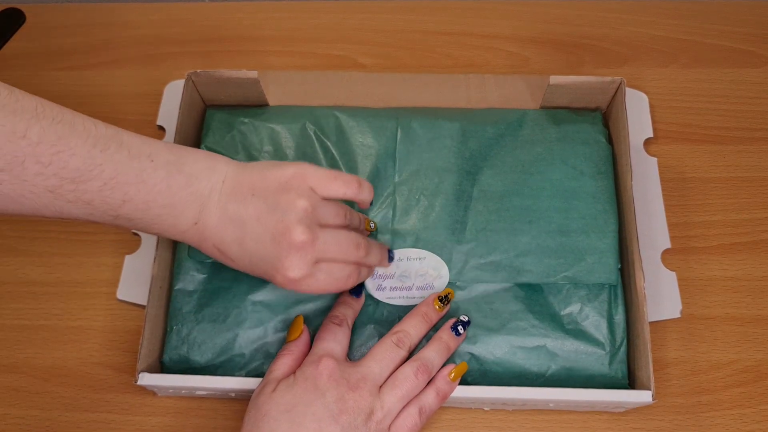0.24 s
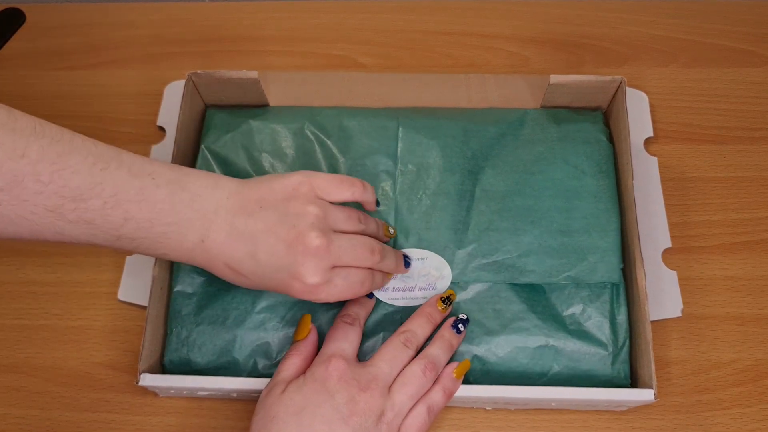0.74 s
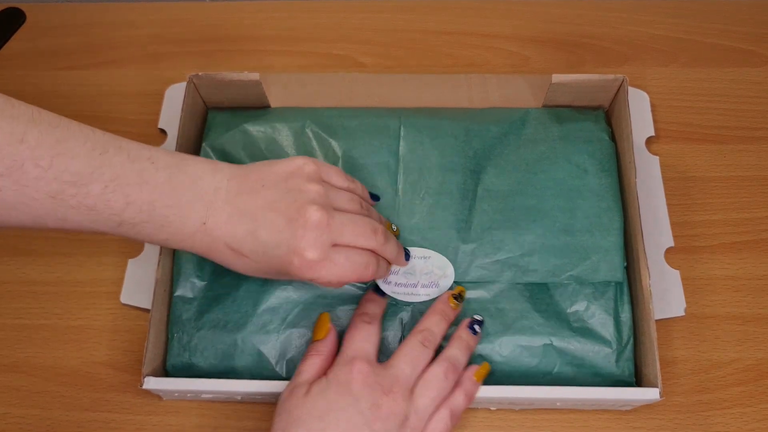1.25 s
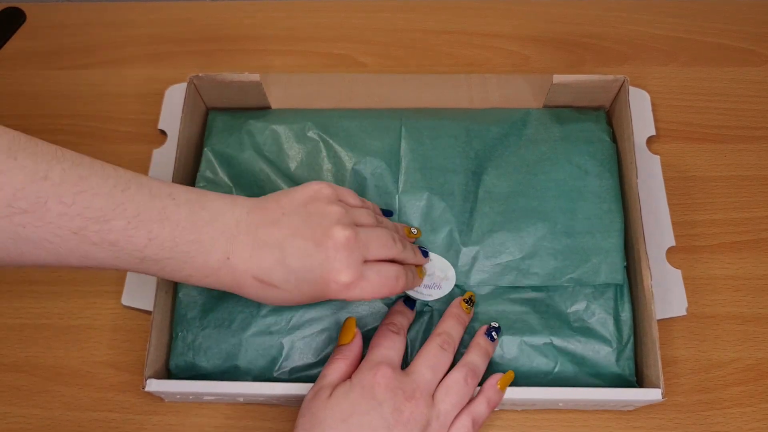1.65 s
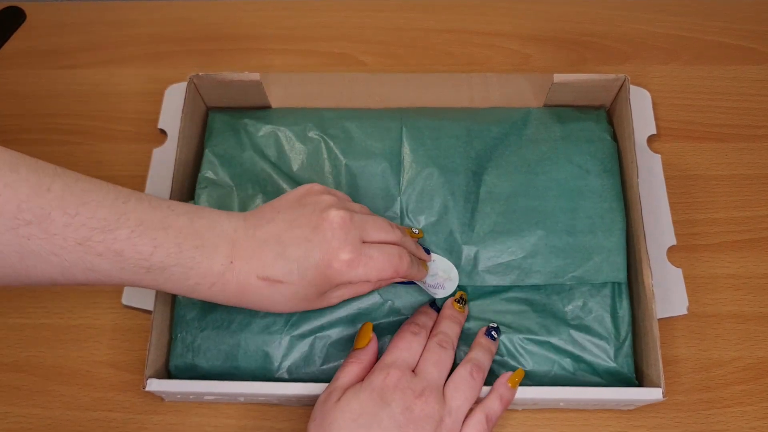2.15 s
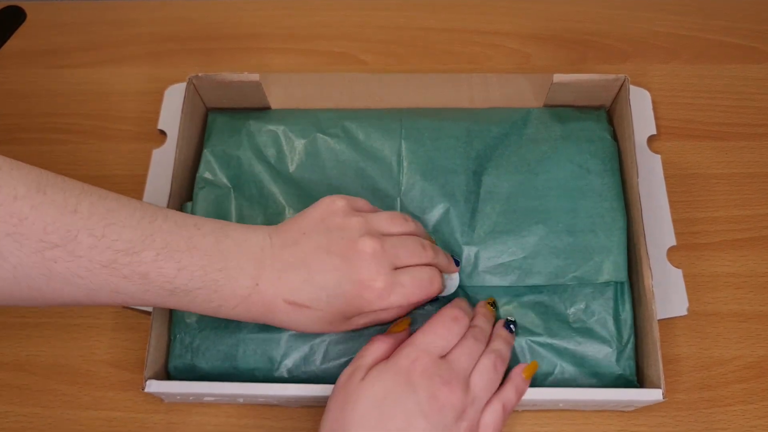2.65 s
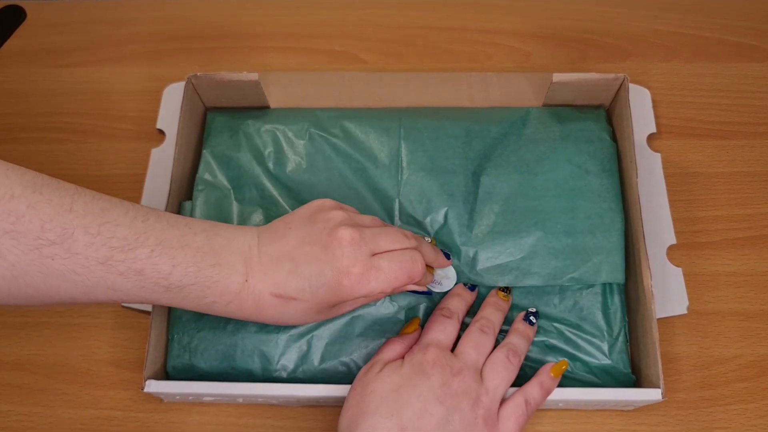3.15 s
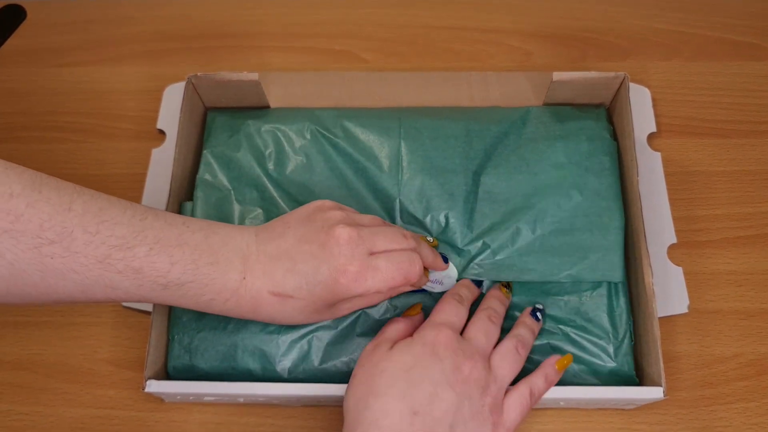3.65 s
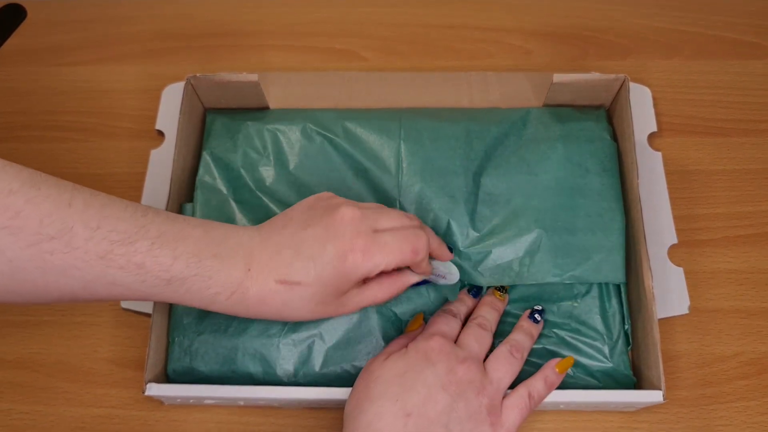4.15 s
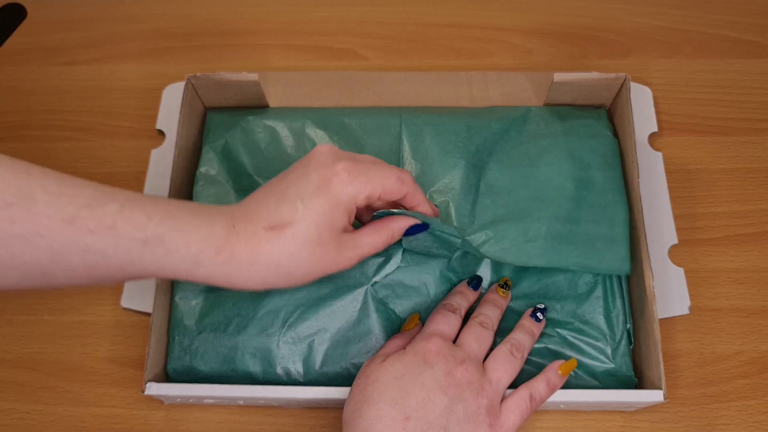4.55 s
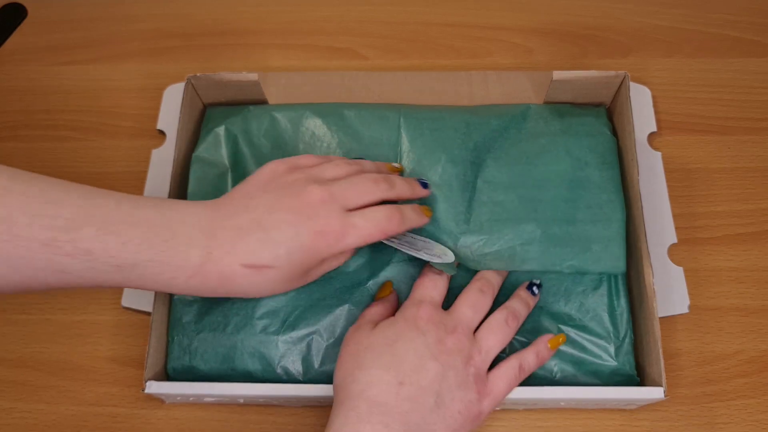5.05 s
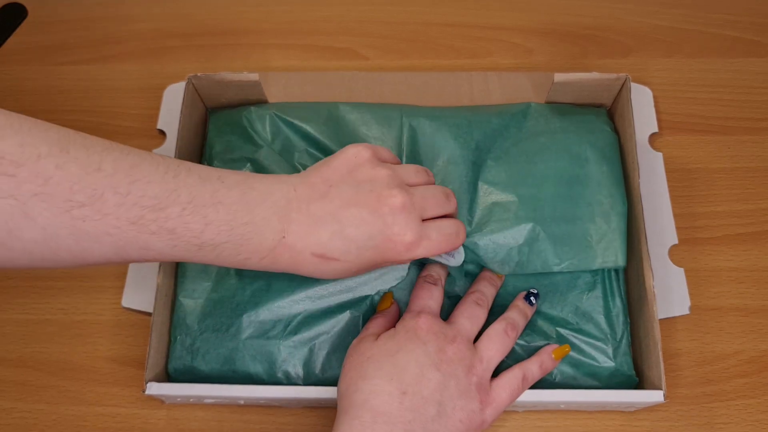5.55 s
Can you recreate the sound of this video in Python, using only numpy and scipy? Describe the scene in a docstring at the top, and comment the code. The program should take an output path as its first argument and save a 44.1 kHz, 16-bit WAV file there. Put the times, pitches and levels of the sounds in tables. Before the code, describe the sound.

Hands fumble at crisp tissue paper in a box, crinkling and rustling unevenly, with small snaps and one sharp crack as a sticker lets go.

```python
"""Sticker peeled off tissue paper.

Hands peel a sticker off the tissue lining of a shallow cardboard box, on a table in a small room.
The sheet rustles with tiny random creases, its panels rasp, single folds snap, runs of folds crunch,
and one sharp crack frees the sticker. Paper and box resonances colour the creases; a short noise
tail is the room. Filtered noise rumbles low under it all, with a faint sine hum.
"""
import sys
import numpy as np
from scipy import signal
from scipy.fft import rfft, irfft
from scipy.io import wavfile
from scipy.ndimage import uniform_filter1d

SR = 44100
rng = np.random.default_rng(int(sys.argv[2]) if len(sys.argv) > 2 else 0)


def materialize(psi):
    """Save the field psi as 16-bit PCM at rate SR to the path in sys.argv[1].

    A 1-D psi becomes a single channel; in a 2-D psi each row is a channel.
    """
    bounded = np.clip(np.atleast_2d(psi).T, -1, 1)
    quanta = np.round(bounded * 32767).astype(np.int16)
    wavfile.write(sys.argv[1], SR, quanta)


N = 255942

# room rumble spectrum, relative: (frequency [Hz], density [dB per Hz])
RUMBLE_SPECTRUM = [(15, -25), (30, -18), (40, 0.5), (58, 0.5), (72, -3), (95, -7.5), (125, -18),
                   (250, -17.5), (1000, -26), (16000, -41)]
# rumble swelling and sinking: (time [s], RMS level [dB])
RUMBLE_LEVEL = [(0, -61), (1.0, -61.5), (1.9, -63), (2.2, -59), (2.9, -60.5), (3.7, -58), (4.4, -60),
                (5.8, -60.5)]
HUM_HZ, HUM_RMS_DB = 53.3, -71.5

# tissue paper in its box, relative: (frequency [Hz], density [dB per Hz])
PAPER_SPECTRUM = [(60, -26), (140, -17), (200, -17), (280, -9.5), (420, -4.5), (560, -6), (700, -4),
                  (980, -8.5), (1300, -4.5), (1800, -3.5), (2250, -5), (3000, -2.5), (4900, -4),
                  (6500, -1.5), (9500, -4.5), (13000, -6), (16000, -9.5)]
# resonances of box and sheet: (centre [Hz], width [Hz], lift [dB])
RESONANCES = [(465, 30, 0.5), (662, 54, 6), (1250, 200, 3), (1568, 165, 4.5), (1770, 180, 2),
              (2650, 1370, 2.5), (6640, 1600, 2)]
# stereo balance of the paper: (frequency [Hz], left minus right [dB])
LEFT_MINUS_RIGHT = [(60, -8.5), (200, 2.5), (400, 3.5), (700, 4), (1290, -1), (2400, -0.6), (4400, -1.2),
                    (8000, 0.3), (15000, 0)]
PAPER_TOP_HZ, CUTOFF_HZ = 17500, 15950

BODY_TOP_HZ, TILT_PIVOT_HZ = 1000, 5500
# splits between the registers above the hollow body: (frequency [Hz])
REGISTER_EDGES_HZ = [2300, 4800, 9000]
# nominal centres of those registers: (frequency [Hz])
REGISTER_CENTRES_HZ = [1500, 3300, 6600, 12000]

# steady grip between strokes; slack paper sounds hollow, taut paper crisp:
# (time [s], rustle level [dB], hollow body [dB], brightness [dB per octave])
GRIP = [(0, -48, 2, -1.5), (.5, -41.5, 1.5, 0), (.72, -46.5, 5.5, -0.2), (1.03, -46, 3.5, 0.5),
        (1.42, -41.5, 1, -0.5), (1.485, -51, 4, 0), (1.57, -39.5, 1, -1.5), (2.03, -47.5, 0, -0.2),
        (2.55, -41.5, 4.5, -1.1), (2.97, -42, 2.5, -1.5), (3.23, -46.5, 7, -1.5), (3.36, -42, 2, 0.2),
        (3.92, -40.5, 3, -0.6), (4.14, -46.5, 4, .5), (4.3, -43, 3.5, -0.8), (4.64, -46, 4.5, -1),
        (5.12, -41.5, 1.5, 0.2), (5.8, -38.5, 4, 1.2)]
# fingers push or pull the sheet and one broad panel flexes: (time [s], length [s], level [dB],
# hollow body [dB], brightness [dB per octave], panel pitch [Hz], panel against level [dB])
STROKES = [(0, 0.014, -39.5, 0, 0.5, 1410, -8.5), (0.176, 0.024, -40, -4, 2, 1340, -7.5),
           (0.423, 0.015, -43.5, -16, 0, 1910, -1.5), (0.519, 0.024, -36.5, 2.5, -.5, 1430, -15),
           (0.903, 0.082, -35.5, 1.5, 0, 1780, -27), (1.25, 0.061, -35.5, 2, 1.3, 1700, -9),
           (1.617, .18, -31, 0.9, 0.3, 3040, -10), (1.871, 0.032, -38.5, -2, .5, 1810, -14),
           (1.96, 0.022, -41, 7.5, 2, 1800, -20), (2.072, 0.18, -37.5, -0.5, 0.3, 2340, -15.5),
           (2.34, .015, -38.5, -5, 1.2, 1800, -14), (2.407, 0.016, -37, 2.5, 2.8, 1800, -10.5),
           (2.636, 0.037, -37, -1, -1, 2870, -10), (2.787, 0.044, -38, 2, -0.2, 2440, -5.5),
           (3.063, 0.039, -42, 2, -0.5, 3160, -14), (3.347, 0.12, -39, 1.5, 0, 1750, -10),
           (3.761, 0.02, -46, 7, 7, 2800, -1), (4.343, 0.1, -42, 3.5, 1.5, 6670, -3),
           (4.446, 0.12, -30.5, -3, 2.6, 3870, -11.5), (4.702, .035, -42.5, 1, 2, 1740, -20),
           (4.824, 0.028, -42, 4.5, 0.5, 1710, -14), (5.332, 0.32, -38, 1.5, 1, 1620, -15),
           (5.769, .04, -28.5, -1, 1.3, 6500, -10)]
STROKE_RISE_DB_PER_S, STROKE_SAG_DB_PER_S, STROKE_FALL_DB_PER_S = 464, 1.5, 413
# sharp tugs at the sticker, sagging as the paper yields: (time [s], length [s], level [dB],
# hollow body [dB], brightness [dB per octave], panel pitch [Hz], panel against level [dB], sag [dB per s])
TUGS = [(0.291, 0.045, -26, 4.5, 0.68, 1880, -10.5, 100), (1.083, 0.077, -26, 3, 1.6, 1250, -16, 65),
        (3.969, 0.058, -21.5, -1.5, 1.7, 6100, -7, 126)]
TUG_RISE_DB_PER_S, TUG_FALL_DB_PER_S = 3200, 344

# single folds snapping:
# (time [s], level of the energy spread over 4 ms [dB], ring [Hz], brightness [dB per octave])
SNAPS = [(.182, -37.5, 1460, -6.5), (0.4345, -31, 7500, 2), (0.608, -34.5, 5900, -2),
         (0.8059, -33.5, 4700, 1.5), (.9363, -31.5, 6800, 8), (1.053, -39, 7700, 1), (1.083, -28, 3320, -9),
         (1.174, -32.5, 10000, 4), (1.5, -39, 4300, -0.5), (1.5662, -34, 7600, 2), (1.6, -27, 6500, 3.5),
         (1.646, -25.5, 7600, -1.5), (1.6925, -23.5, 7300, -6.5), (1.7163, -26, 5930, -1),
         (1.7434, -26.5, 3020, 3), (1.7594, -29.5, 8200, -2), (1.787, -30, 6100, 1),
         (2.2148, -27.5, 6500, -1), (2.797, -33, 1700, -1.5), (2.9206, -33.5, 5350, -2.5),
         (3.076, -32.5, 7600, -1.5), (3.1664, -31.5, 6800, -0.5), (3.3503, -34, 9200, 0),
         (3.8904, -30, 6200, -1.5), (3.9253, -26.5, 7500, -4), (4.1061, -35, 8400, -3),
         (4.126, -36.5, 6200, 2), (4.4666, -34, 7600, -5), (5.2616, -34, 7000, 3.5), (5.6984, -34, 7700, 3)]
# faint stray snaps: least level against the grip, mean random excess before its cap, mean brightness
TICKS_PER_S, TICK_DB, TICK_SPREAD_DB, TICK_TILT_DB_PER_OCTAVE = 23, -0.5, 2, 2.8
# runs of folds giving way together:
# (centre time [s], level [dB], standard deviation of the bell [s], brightness [dB per octave])
CRUNCHES = [(0.295, -27.5, 0.0097, 5.5), (3.403, -34, .005, 4), (3.447, -35.5, 0.011, 7),
            (3.477, -32.5, 0.0069, 2.5), (3.513, -34.5, 0.0047, 7), (3.557, -31, 0.011, 3),
            (5.459, -30, 0.007, 3.5), (5.518, -39, .006, 10), (5.56, -33.5, 0.011, 8.5)]
# the sticker lets go; the level is the energy spread over 4 ms, before panning
CRACK_S, CRACK_DB, CRACK_HZ, CRACK_WIDTH_HZ = 3.9684, -15.5, 6400, 900
# the tail's treble decays in a fraction of this time; level against the dry paper
ROOM_T60_S, ROOM_DB = 0.15, -10


def from_db(db):
    """Amplitude ratio of a level in dB."""
    return 10 ** (np.asarray(db) / 20)


def rms_one(x):
    """Scales to RMS 1 over all channels."""
    return x / np.sqrt(np.mean(x ** 2) + 1e-20)


def at_hz(points, hz):
    """Reads a spectrum on a log-frequency axis."""
    points = np.array(points)
    return np.interp(np.log(hz + 1e-9), np.log(points[:, 0]), points[:, 1])


def in_time(rows):
    """Interpolates each column of a time table to every sample."""
    s, *columns = np.transpose(rows)
    return [np.interp(np.arange(N) / SR, s, column) for column in columns]


def cut(x, hz, kind, order=3):
    """Butterworth low- or high-pass."""
    return signal.sosfilt(signal.butter(order, hz, kind, fs=SR, output="sos"), x + 1e-18)


def convolve(x, response):
    """Convolves along time, trimmed to the scene length."""
    return signal.oaconvolve(np.atleast_2d(x), response, axes=-1)[:, :N]


def add(out, s, sound):
    """Mixes a short stereo sound in at time s."""
    start = max(round(s * SR), 0)
    out[:, start:start + sound.shape[1]] += sound[:, :N - start]


def resonate(x, hz, width_hz):
    """Two-pole resonance with about unit peak gain."""
    r = np.exp(-np.pi * width_hz / SR)
    numerator = np.array([1, 0, -1]) * (1 - r * r) / 2
    denominator = [1, -2 * r * np.cos(2 * np.pi * hz / SR), r * r]
    return signal.lfilter(numerator, denominator, x + 1e-18)


def colour(x, gain_db, size=4096):
    """Causal minimum-phase filter with the gain curve gain_db(Hz)."""
    hz = np.arange(size // 2 + 1) * SR / size
    cepstrum = irfft(np.log(from_db(gain_db(hz))))
    # folding the cepstrum gives minimum phase
    cepstrum[..., 1:size // 2] *= 2
    cepstrum[..., size // 2 + 1:] = 0
    return convolve(x, irfft(np.exp(rfft(cepstrum))))


def background():
    """Low noise rumble, nearly alike on both sides, and a sine hum."""
    noise = rng.standard_normal(N) + from_db(-10.0) * rng.standard_normal((2, N))
    rumble = rms_one(colour(noise, lambda hz: at_hz(RUMBLE_SPECTRUM, hz)[None], size=16384))
    hum = np.sqrt(2) * np.sin(2 * np.pi * HUM_HZ * np.arange(N) / SR)
    return from_db(in_time(RUMBLE_LEVEL)[0]) * rumble + from_db(HUM_RMS_DB) * hum


def side_lean_db(hz):
    """Left and right gains that share the stereo balance equally."""
    return at_hz(LEFT_MINUS_RIGHT, hz) * np.array([[0.5], [-0.5]])


def paper_db(hz):
    """Sheet spectrum with its resonances, left and right."""
    lifts = sum(db / (1 + (2 * (hz - centre) / width) ** 2) for centre, width, db in RESONANCES)
    return at_hz(PAPER_SPECTRUM, hz) + lifts + side_lean_db(hz)


def registers(x):
    """Splits into the hollow body and four registers above it."""
    parts = []
    for edge_hz in [BODY_TOP_HZ] + list(REGISTER_EDGES_HZ):
        low = signal.sosfiltfilt(signal.butter(3, edge_hz, fs=SR, output="sos"), x)
        parts.append(low)
        x = x - low
    return np.array(parts + [x])


def shade(parts, body_db, tilt):
    """Remixes registers: body gain, and a slope in dB per octave above it."""
    out = from_db(body_db) * parts[0]
    for hz, part in zip(REGISTER_CENTRES_HZ, parts[1:]):
        out = out + from_db(tilt * np.log2(hz / TILT_PIVOT_HZ)) * part
    return out


def crease(hz, ring_db, shiver_t60, shiver_db, q=8.0, size=1024):
    """One buckling crease: click, shiver of the sheet, brief facet ring; mean energy 1 per side."""
    shiver = rng.standard_normal((2, size)) * from_db(-60 * np.arange(size) / SR / shiver_t60)
    pulse = from_db(shiver_db) * rms_one(shiver) / np.sqrt(size)
    # click positions set the lag between the sides
    pulse[[0, 1], rng.integers(0, 10, 2)] += rng.choice([-1, 1])
    ringing = pulse + from_db(ring_db) * resonate(pulse, hz, hz / q)
    return rms_one(ringing) / np.sqrt(size)


def avalanches(per_s, spread_db, fade_s):
    """Stress lets go in sudden random jumps that fade at once."""
    heights = from_db(spread_db * np.minimum(rng.exponential(1, N), 3))
    jumps = (rng.random(N) < per_s / SR) * heights
    return signal.lfilter([1], [1, -np.exp(-1 / (fade_s * SR))], jumps + 1e-18)


def facets(count, moves_per_s, local_share):
    """Facet of each crease: many stay on the one giving way, the rest scatter over the sheet."""
    moves = rng.random(N) < moves_per_s / SR
    latest_move = np.maximum.accumulate(np.arange(N) * moves)
    giving_way = rng.integers(count // 4, count, N)
    anywhere = rng.integers(0, count, N)
    return np.where(rng.random(N) < local_share, giving_way[latest_move], anywhere)


def crackle(per_s, spread_db, jumps_db, even_s=0.065, count=24):
    """Creases of many sizes buckle in clumps on pitched facets; registers of an evened level."""
    stress = 1 + from_db(jumps_db) * avalanches(per_s=65, spread_db=-8.0, fade_s=0.0067)
    spread = from_db(spread_db * np.minimum(rng.exponential(1, N), 4.5))
    sizes = stress * spread * rng.choice([-1, 1], N)
    clicks = sizes * (rng.random(N) < per_s / SR)
    facet = facets(count, moves_per_s=70, local_share=0.38)
    sheet = np.zeros((2, N))
    for k, hz in enumerate(np.geomspace(500, 14000, count)):
        response = crease(hz, ring_db=5.0, shiver_t60=0.014, shiver_db=5.5)
        sheet += convolve(clicks * (facet == k), response)
    sheet = cut(colour(sheet, paper_db), PAPER_TOP_HZ, "low", order=8)
    local_power = uniform_filter1d(np.mean(sheet ** 2, axis=0), int(even_s * SR))
    return registers(sheet / np.sqrt(local_power + 1e-12))


def motion(s, length_s, rise, sag, fall, lead_s=0.037, tail_s=0.45):
    """A hand movement builds, sags and dies (slopes in dB per s): its samples and heights."""
    first = max(round((s - lead_s) * SR), 0)
    last = min(round((s + length_s + tail_s) * SR), N)
    near = np.arange(first, last)
    t = near / SR - s
    height_db = rise * np.minimum(t, 0) - sag * np.clip(t, 0, length_s) - fall * np.maximum(t - length_s, 0)
    return near, from_db(height_db)


def movements():
    """Strokes and tugs as (samples, strengths, body dB, brightness, panel Hz, panel dB)."""
    moves = []
    for s, length_s, level_db, *timbre in STROKES:
        near, height = motion(s, length_s, STROKE_RISE_DB_PER_S, STROKE_SAG_DB_PER_S, STROKE_FALL_DB_PER_S)
        moves.append((near, from_db(level_db) * height, *timbre))
    for s, length_s, level_db, *timbre, sag in TUGS:
        near, height = motion(s, length_s, TUG_RISE_DB_PER_S, sag, TUG_FALL_DB_PER_S)
        moves.append((near, from_db(level_db) * height, *timbre))
    return moves


def rustle():
    """Hand motion drives the crackle; each movement lends its colour by its share of the power."""
    grip_db, body_db, tilt = in_time(GRIP)
    power = from_db(grip_db) ** 2
    for near, strength, own_body_db, own_tilt, _, _ in movements():
        power[near] += strength ** 2
        share = strength ** 2 / power[near]
        body_db[near] += share * (own_body_db - body_db[near])
        tilt[near] += share * (own_tilt - tilt[near])
    parts = crackle(per_s=3400, spread_db=3.0, jumps_db=-6)
    return np.sqrt(power) * shade(parts, body_db, tilt)


def panels(per_s=2500, spread_db=-0.5, q=4.3):
    """A flexing panel is set ringing by a quick run of slips along its edge."""
    sizes = from_db(spread_db * np.minimum(rng.exponential(1, N), 4))
    slips = (rng.random(N) < per_s / SR) * sizes * rng.choice([-1, 1], N)
    out = np.zeros((2, N))
    for near, strength, _, _, hz, panel_db in movements():
        response = crease(hz, ring_db=11, shiver_t60=0.0049, shiver_db=0)
        rasp = convolve(slips[near], response)[:, :len(near)]
        ringing = rms_one(resonate(rasp, hz, hz / q))
        out[:, near] += from_db(panel_db + side_lean_db(hz)) * strength * ringing
    return out


def room(x, size=16384):
    """Diffuse reflections from table and walls as decaying noise; the treble dies sooner."""
    t = np.arange(size) / SR
    noise = rng.standard_normal((2, size)) * (t > 0.004)
    low = cut(noise, 4130, "low") * from_db(-60 * t / ROOM_T60_S)
    treble = cut(noise, 5000, "high") * from_db(-60 * t / (0.38 * ROOM_T60_S))
    return convolve(x, rms_one(low + treble) / np.sqrt(size))


def at_level(pulse, level_db):
    """Scales a pulse so that its energy, spread over 4 ms, has this level."""
    return from_db(level_db) * rms_one(pulse) * np.sqrt(0.004 * SR / pulse.shape[1])


def snap(level_db, ring_hz, tilt):
    """One fold flips over: a crease coloured by the sheet."""
    def gain_db(hz):
        octaves = np.log2(np.clip(hz, BODY_TOP_HZ, CUTOFF_HZ) / TILT_PIVOT_HZ)
        return paper_db(hz) + tilt * octaves
    pulse = crease(ring_hz, ring_db=2, shiver_t60=0.012, shiver_db=9, q=2.5)
    pulse = colour(cut(pulse, 450, "high", order=2), gain_db)
    return at_level(cut(pulse, PAPER_TOP_HZ, "low", order=8), level_db)


def snaps():
    """Larger folds flip one at a time; small ones tick at random while the sheet is held."""
    out, grip_db = np.zeros((2, N)), in_time(GRIP)[0]
    for s, level_db, ring_hz, tilt in SNAPS:
        add(out, s, snap(level_db, ring_hz, tilt))
    for i in np.flatnonzero(rng.random(N) < TICKS_PER_S / SR):
        level_db = grip_db[i] + TICK_DB + TICK_SPREAD_DB * min(rng.exponential(), 2)
        tilt = TICK_TILT_DB_PER_OCTAVE + rng.normal()
        add(out, i / SR, snap(level_db, rng.uniform(1800, 11000), tilt))
    return out


def swell(s, sigma_s):
    """A bell-shaped rise and fall around time s: its samples and heights."""
    first = max(round((s - 4 * sigma_s) * SR), 0)
    last = min(round((s + 4 * sigma_s) * SR), N)
    near = np.arange(first, last)
    return near, np.exp(-0.5 * ((near / SR - s) / sigma_s) ** 2)


def crunches():
    """Short runs of dense creases as folds give way together."""
    parts = crackle(per_s=10000, spread_db=2.8, jumps_db=-18)
    out = np.zeros((2, N))
    for s, level_db, sigma_s, tilt in CRUNCHES:
        near, height = swell(s, sigma_s)
        out[:, near] += from_db(level_db) * height * shade(parts[..., near], 0, tilt)
    return out


def crack():
    """Taut paper lets go of the sticker and rings for a few cycles, a little to the right."""
    pulse = crease(CRACK_HZ, ring_db=6, shiver_t60=0.013, shiver_db=9)
    ring = rms_one(resonate(pulse, CRACK_HZ, CRACK_WIDTH_HZ))
    click = rms_one(cut(pulse, BODY_TOP_HZ, "high"))
    pulse = ring + from_db(-8) * click
    sides = np.array([at_level(side[None], CRACK_DB)[0] for side in pulse])
    out = np.zeros((2, N))
    add(out, CRACK_S, from_db([[-1.5], [1.5]]) * sides)
    return out


def scene():
    """Paper sounds, their room reflections and the background."""
    paper = rustle() + panels() + snaps() + crunches() + crack()
    return paper + from_db(ROOM_DB) * room(paper) + background()


def record(dry):
    """Cuts the top steeply with an elliptic low-pass."""
    return signal.sosfilt(signal.ellip(10, 0.1, 80, CUTOFF_HZ, fs=SR, output="sos"), dry)


dry = scene()
out = record(dry)
materialize(out)
```